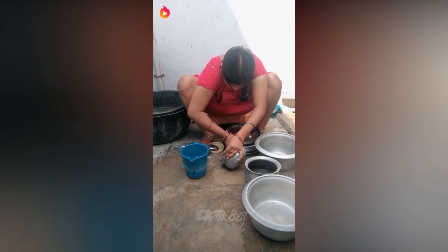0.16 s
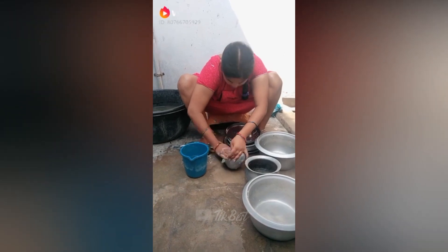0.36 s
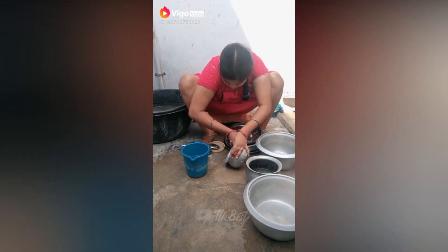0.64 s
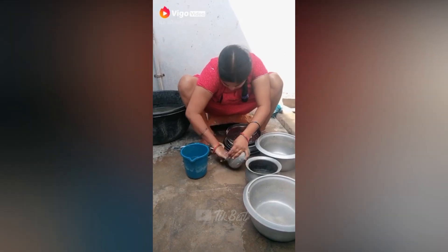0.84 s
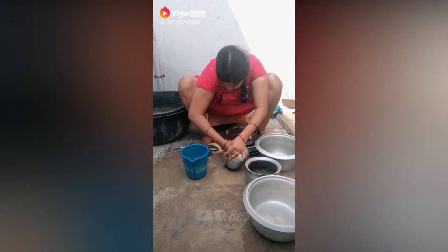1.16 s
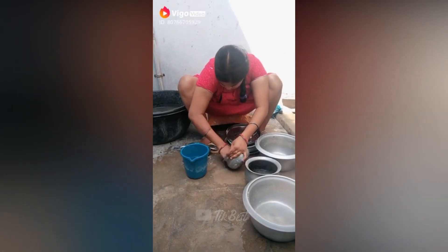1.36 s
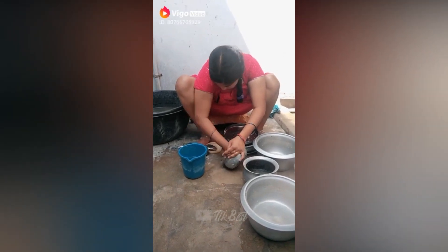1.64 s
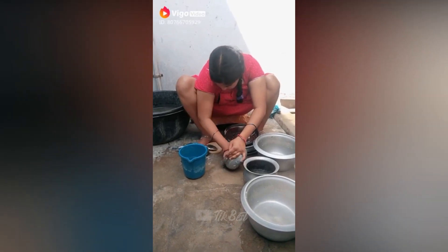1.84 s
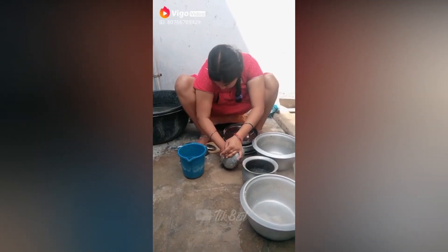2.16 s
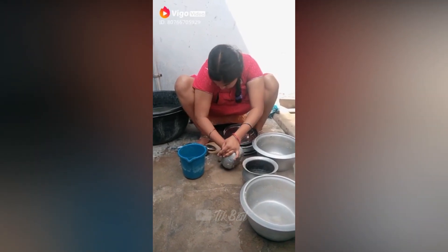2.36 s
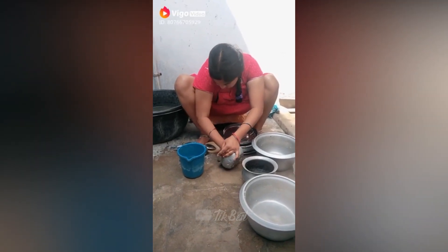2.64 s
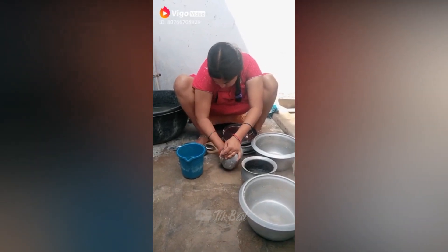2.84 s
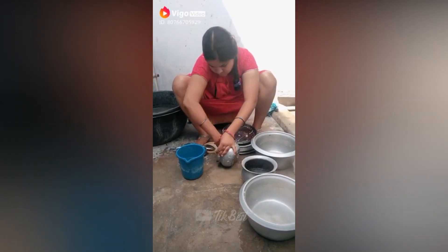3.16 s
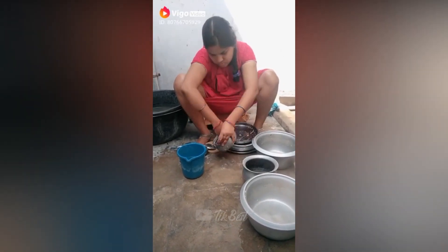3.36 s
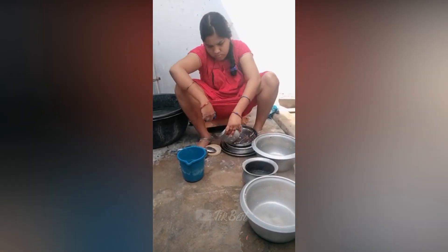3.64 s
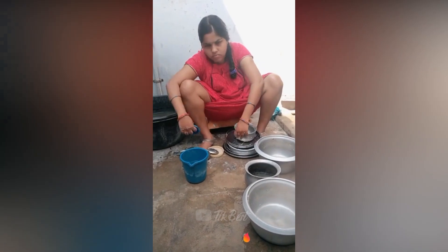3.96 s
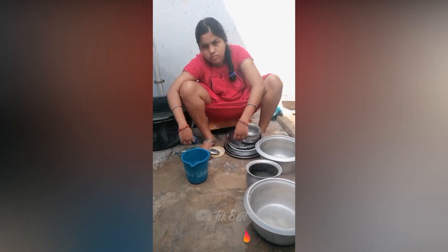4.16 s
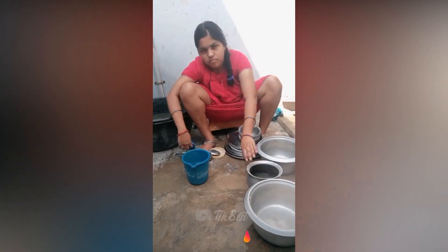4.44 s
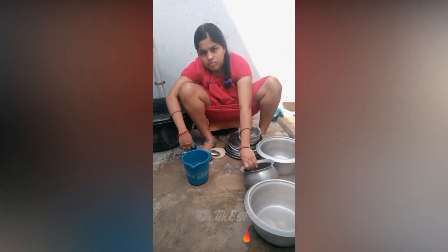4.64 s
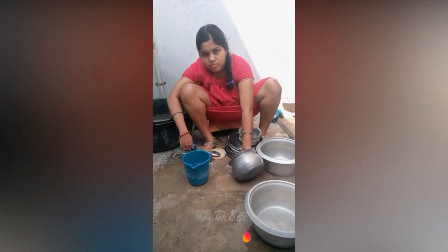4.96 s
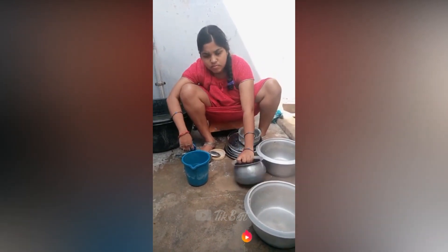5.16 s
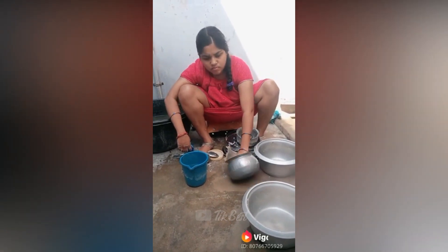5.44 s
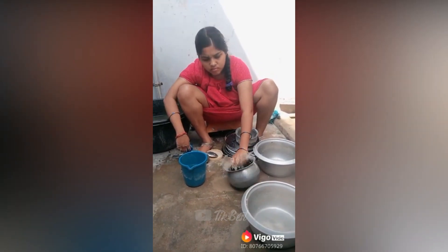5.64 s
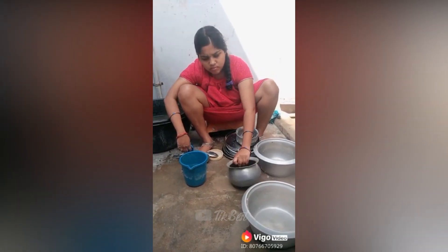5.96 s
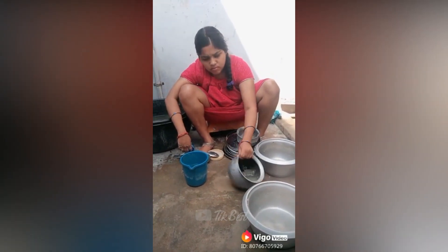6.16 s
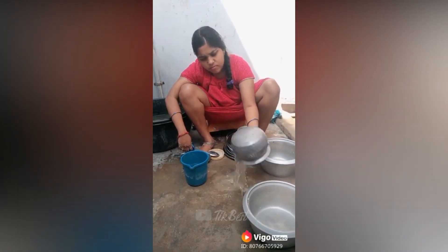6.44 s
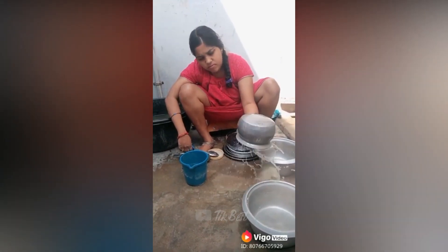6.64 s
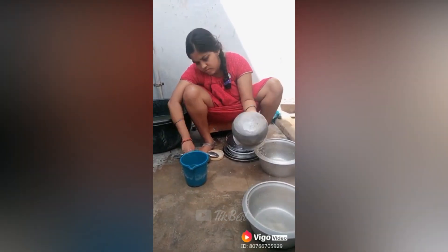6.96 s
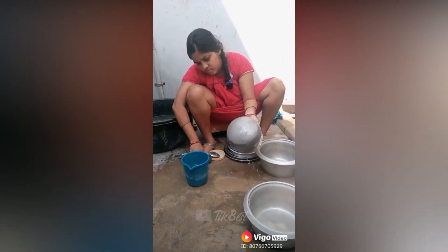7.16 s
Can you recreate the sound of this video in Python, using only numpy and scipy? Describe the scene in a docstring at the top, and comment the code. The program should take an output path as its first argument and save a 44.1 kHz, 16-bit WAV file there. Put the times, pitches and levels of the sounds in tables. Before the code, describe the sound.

Dishwashing by hand on a concrete floor: quick, quiet gritty scrubbing, punctuated by hollow pot bumps and a sharp tick. The pot lands among rattling plates; a larger water pot is struck, rolls with a hollow rumble and rings when righted. Water sloshes inside, then spills with bubbling plops and spray. Short yard echoes, left-heavy pickup, soft outdoor rumble.

```python
"""A wet pad scours a small metal pot in short rasping strokes over a low outdoor rumble: strands catch on metal.
Pot knocks floor and plates, plates rattle: damped modal thuds, clacks, clinks, dense catches for slides.
A round water pot is struck, rolled and righted: ringing wall modes, rumble in a resonant cavity.
Water swirls and pours out: bubble clouds, spray, chirping drops, large plops.
Concrete floor of a walled yard; sources left of the microphone, right port late and muffled."""
import sys
import numpy as np
from scipy import signal
from scipy.fft import rfft, irfft, next_fast_len
from scipy.io import wavfile
from scipy.ndimage import uniform_filter1d, map_coordinates

SR = 44100
rng = np.random.default_rng(int(sys.argv[2]) if len(sys.argv) > 2 else 0)


def log_audio(samples):
    """Write samples as a 16-bit WAV file to the path given in sys.argv[1]."""
    # one column per channel
    frames = np.atleast_2d(samples).T
    # limit to full scale, then quantise
    limited = np.clip(frames, -1, 1)
    pcm = np.round(limited * 32767).astype(np.int16)
    wavfile.write(sys.argv[1], SR, pcm)


N = 322371
TIME = np.arange(N) / SR
HZ = np.maximum(np.fft.rfftfreq(next_fast_len(N), 1 / SR), 1)

# Levels are source levels, ahead of mix trims, echo and port gains.
# Base t60s are scaled per layer; peak levels are ahead of each lift_db.

# outdoor air colour: f/Hz, gain/dB
AIR_COLOUR = [(15, -43), (25, -53), (46, -13), (102, -3), (135, -11.5), (212, -13), (241, -19),
              (270, -15.5), (399, -24.5), (440, -28), (469, -26.5), (670, -29.5), (897, -38.5), (972, -35),
              (1200, -82.5), (1560, -84.5), (2640, -120)]
# right port relative to left: f/Hz, gain/dB
SHADE = [(60, 2.5), (120, -4), (250, -5.5), (500, -14.5), (1000, -25.5), (2000, -34), (4000, -56),
         (12000, -59.5)]
# heavy vessels bumping the floor: t/s, f/Hz, level/dB, t60/s
THUMPS = [(0.634, 300.6, -36.5, 0.32), (2.699, 244, -45, 0.06), (2.875, 225, -23.5, 0.015),
          (3.923, 182, -29, 0.087), (4.615, 196, -23.5, 0.092), (4.625, 100, -40, 0.54),
          (4.939, 128, -42.5, 0.41), (5.055, 97, -31.5, 0.14), (5.06, 302, -31, 0.1),
          (5.195, 340, -34.5, 0.14), (6.127, 82.5, -28.5, 0.086)]
# scouring strokes: start/s, length/s, rasp/dB, hiss/dB
STROKES = [(-0.06, 0.056, -64, -60.5), (0.085, 0.078, -61, -56), (0.265, 0.082, -62, -64.5),
           (0.65, 0.13, -70.5, -66), (0.79, 0.11, -57, -54.5), (1.0, 0.15, -63.5, -57.5),
           (1.26, 0.14, -66.5, -64.5), (1.525, 0.16, -60, -57), (1.66, 0.15, -62.5, -59),
           (1.79, 0.21, -51.5, -55), (2.01, 0.25, -55.5, -57), (2.18, 0.22, -59.5, -62),
           (2.34, 0.21, -53.5, -54.5), (2.56, 0.34, -54, -58), (2.9, 0.089, -54.5, -56),
           (3.02, 0.11, -65, -70.5), (3.17, 0.039, -53, -64), (3.26, 0.012, -42, -48.5),
           (3.51, 0.061, -59, -69.5)]
# pad colour: f/Hz, gain/dB
PAD_COLOUR = [(600, 13.5), (1150, -13.5), (1500, 1), (1900, -4), (2300, -4), (3200, -4), (5000, -3.5),
              (8000, -4.5), (11500, -12.5), (14000, -41.5)]
# small pot and plate resonances: f/Hz, width/Hz, level/dB
PLATE_PEAKS = [(1866, 170, -4.5), (2560, 98, -1), (3125, 178, -4), (5400, 230, -10.5), (7440, 81, -19.5),
               (8850, 340, -11.5)]
# wet metal squealing under pad, on metal or on floor: start/s, length/s, first f/Hz, last f/Hz,
# nominal width/Hz, level/dB
SQUEALS = [(0.31, 0.094, 5560, 4920, 810, -60.5), (2.92, 0.07, 4670, 4400, 200, -57.5),
           (2.955, 0.025, 12100, 11500, 370, -49), (4.085, 0.05, 4780, 4660, 400, -43),
           (4.195, 0.024, 4900, 4780, 300, -42.5), (4.92, 0.078, 2495, 1947, 250, -48.5),
           (5.0, 0.069, 5600, 5000, 700, -50.5)]
# small pot against floor and plates: t/s, thud f/Hz, thud/dB, clack/dB, tick/dB, base t60/s
KNOCKS = [(0.521, 493, -47.5, -70, -39.5, 0.063), (0.572, 576, -53.5, -42.5, -37, 0.05),
          (0.609, 580, -46.5, -65.5, -29.5, 0.0099), (0.629, 608, -26.5, -52.5, -34.5, 0.045),
          (0.637, 631, -27, -44.5, -59.5, 0.056), (0.744, 630, -65, -54, -49, 0.11),
          (0.758, 638, -49.5, -42, -18, 0.018), (1.935, 852, -38.5, -34, -36.5, 0.12),
          (2.159, 582, -44, -48.5, -47.5, 0.078), (2.185, 640, -65, -39, -34, 0.054),
          (2.348, 412, -63, -58, -41, 0.1), (2.473, 600, -42.5, -42, -31, 0.031),
          (2.7, 655, -31, -66, -46.5, 0.062), (2.802, 822, -36, -28.5, -36, 0.055),
          (2.807, 810, -31, -45, -25.5, 0.032), (2.822, 743, -42, -38, -32, 0.19),
          (2.858, 540, -51.5, -41, -44, 0.046), (3.287, 434, -53, -68, -35, 0.026),
          (3.478, 344, -54.5, -44, -45, 0.16), (3.912, 858, -33.5, -30, -35, 0.12),
          (3.928, 490, -24.5, -49.5, -36, 0.078), (3.956, 510, -27, -50, -48.5, 0.021),
          (4.013, 612, -33, -25.5, -26, 0.056), (4.02, 800, -50.5, -28, -35.5, 0.06),
          (4.032, 567, -22.5, -35, -38, 0.054), (4.04, 376, -51, -25, -29, 0.062),
          (4.092, 710, -63, -51, -36, 0.097), (4.119, 710, -57, -52, -30, 0.065),
          (4.169, 664, -48, -32, -30.5, 0.051), (4.212, 695, -47, -39.5, -36.5, 0.073),
          (4.245, 680, -56, -48, -39, 0.033), (4.356, 690, -57, -38.5, -39, 0.036),
          (4.381, 765, -30.5, -35, -29, 0.038), (4.539, 685, -52, -57, -49.5, 0.13)]
# knock colour: f/Hz, gain/dB
KNOCK_COLOUR = [(100, -47), (200, -1.5), (350, -15), (600, -1.5), (1000, -4.5), (1500, 1.5), (2400, 5.5),
                (4500, -3.5), (8000, -7), (12000, -14.5), (14000, -36.5)]
# rim clinks on the sharpest knocks: t/s, brightest f/Hz, level/dB, t60/s
CLINKS = [(0.608, 11700, -33, 0.014), (0.629, 8250, -30.5, 0.035), (0.756, 7500, -19, 0.015),
          (2.189, 11000, -67, 0.011), (2.807, 5300, -30, 0.024), (3.287, 6200, -31, 0.032),
          (3.477, 2580, -36, 0.026)]
# small pot rim modes: f/Hz, level/dB
RIM_MODES = [(2620, 7.5), (5550, -5), (8100, -1), (12000, 2)]
# small pot dragged over floor: start/s, length/s, rumble/dB, rasp/dB, hiss/dB
DRAGS = [(0.44, 0.096, -40.5, -51, -43), (0.66, 0.071, -48, -88.5, -63.5)]
# drag colour: f/Hz, gain/dB
DRAG_COLOUR = [(100, -16), (300, -5), (700, -2), (1100, -4.5), (1700, 14.5), (2600, 9), (4300, -14),
               (7500, -11.5), (10000, -4.5), (13000, -12.5)]
# plates rock, slide and settle: start/s, length/s, rumble/dB, rasp/dB, hiss/dB
PLATE_SLIDES = [(3.905, 0.035, -32.5, -43, -44), (4.01, 0.035, -38, -41, -41),
                (4.07, 0.072, -54, -42.5, -40), (4.15, 0.07, -46.5, -45, -49),
                (4.38, 0.016, -47.5, -56, -64)]
# sliding plate resonances: f/Hz, width/Hz, level/dB
SLIDE_PEAKS = [(2380, 540, 1), (4800, 150, -5.5), (5300, 72, -23), (6150, 310, 4), (9170, 120, 6)]
# blows on water pot: t/s, thud f/Hz, thud/dB, clack/dB, tick/dB, base t60/s, ring/dB
CLANGS = [(4.606, 1010, -22, -29.5, -29, 0.066, -35.5), (4.661, 601, -33, -39, -37.5, 0.16, -41.5),
          (4.696, 720, -45, -39, -52, 0.025, -70), (4.81, 976, -42, -50, -58, 0.031, -44.5),
          (4.858, 540, -38, -39, -50, 0.032, -55.5), (4.907, 700, -52, -37, -45, 0.025, -51),
          (5.194, 1031, -27.5, -33, -20.5, 0.11, -25.5), (5.378, 517, -76, -53, -45.5, 0.11, -52.5)]
# water pot tips, rolls on rim, then belly, rocks to rest:
# start/s, length/s, rumble/dB, rasp/dB, hiss/dB, ring/dB
ROLLS = [(4.54, 0.18, -44.5, -60, -65, -51.5), (4.62, 0.22, -45, -46, -47.5, -42),
         (4.82, 0.24, -39.5, -45.5, -46, -52.5), (5.08, 0.36, -49.5, -61.5, -67.5, -70)]
# water pot wall modes: f/Hz, free level/dB, t60/s, level against floor/dB
POT_MODES = [(712, -30, .3, -9), (910.5, -18.5, 1.6, -12), (1061, -14, .75, -2), (1297, -20.5, .65, -12),
             (1465, -11, .22, -12), (1492, -5, .32, -7), (1516, -11, .33, -11), (1610, -11, .14, -20),
             (1691, -12, .8, -4), (2099, -3, .22, -6), (2920, -18, .5, -8), (3190, -11, .14, -10),
             (3465, -20, .15, -12), (3878, -8, .28, -4), (5780, -17, .3, -8)]
# crowded upper water pot resonances: f/Hz, width/Hz, level/dB
POT_PEAKS = [(4270, 18, 2), (5400, 34, -6), (5760, 29, -5), (6900, 90, -7.5), (7200, 49, -19),
             (7290, 39, 3), (7680, 71, -5.5), (8820, 23, 11)]
# air inside water pot: f/Hz, width/Hz, level/dB
CAVITY = [(202, 25, -9), (299, 30, 5), (385, 25, 0), (505, 30, -2), (571, 55, 5)]
# water pot colour: f/Hz, gain/dB
POT_COLOUR = [(30, -51), (76, -17), (130, -5.5), (302, 0), (446, -11.5), (554, -1), (787, -12.5),
              (1060, -12.5), (1360, -11), (1470, -18.5), (2200, -3.5), (2560, -13.5), (3000, -10),
              (3770, -11), (7930, -8), (12400, -20.5), (14000, -49)]
# pot booms in rolling, gulps as water swings, sings in pouring:
# start/s, length/s, first f/Hz, last f/Hz, nominal width/Hz, level/dB
BOOMS = [(4.83, 0.04, 534, 555, 40, -36), (4.905, 0.074, 533, 596, 129, -34),
         (4.98, 0.11, 568, 584, 173, -43.5), (4.97, 0.1, 316.5, 300.4, 69.6, -42),
         (5.94, 0.06, 600, 608, 70, -50.5), (5.99, 0.057, 269, 403.7, 110, -32.5),
         (6.032, 0.033, 552, 589, 59.1, -26.5), (6.075, 0.11, 574.6, 592, 178, -45.5),
         (6.385, 0.031, 1450, 1470, 90, -41.5), (6.69, 0.044, 1074, 1084, 59.6, -47.5),
         (6.705, 0.031, 1520, 1550, 50, -42.5), (6.75, 0.04, 1570, 1527, 120, -49)]
# water surges, from swishes through slosh and gulp to pour and drain-off:
# start/s, length/s, slosh/dB, bubbles/dB, spray/dB
SURGES = [(5.59, 0.14, -42.5, -48.5, -46), (5.81, 0.09, -56, -42.5, -42.5), (5.95, 0.21, -36, -46, -62),
          (6.0, 0.1, -30, -43.5, -45.5), (6.24, 0.21, -67, -59, -50), (6.41, 0.277, -59, -45.5, -42.5),
          (6.735, 0.12, -50, -41, -38.5), (7.025, 0.036, -60, -61, -44), (6.97, 0.18, -58, -52.5, -46)]
# water landing: t/s, bubbles/dB, spray/dB, base t60/s
SPLASHES = [(5.604, -38, -38, 0.2), (5.668, -35, -30, 0.064), (5.7, -48, -37, 0.11),
            (5.884, -42, -32.5, 0.086), (5.891, -37, -43, 0.022), (5.906, -46, -30.5, 0.037),
            (5.947, -44, -32, 0.04), (5.968, -40.5, -28, 0.031), (6.006, -35, -48, 0.035),
            (6.017, -46, -28, 0.024), (6.105, -38, -39, 0.091), (6.119, -33.5, -41, 0.094),
            (6.164, -39, -38, 0.084), (6.259, -45, -42, 0.062), (6.413, -30, -30, 0.055),
            (6.553, -34.5, -29, 0.045), (6.673, -70, -36.5, 0.4), (6.745, -28.5, -16, 0.049),
            (6.769, -34, -27, 0.056), (6.786, -51, -34, 0.05), (6.805, -19, -21, 0.03),
            (6.812, -27, -24, 0.014), (6.871, -55, -29.5, 0.057), (6.896, -33.5, -30.5, 0.043),
            (6.955, -51, -35.5, 0.055), (7.031, -42.5, -31, 0.078), (7.043, -40, -35.5, 0.055),
            (7.108, -60, -30.5, 0.023), (7.118, -60, -40, 0.011), (7.158, -58, -48, 0.047),
            (7.247, -72, -35, 0.035), (7.291, -71, -36.5, 0.045)]
# single large bubbles: t/s, f/Hz, level/dB, t60/s, phase rise (pitch climbs by twice this share over t60)
PLOPS = [(5.624, 2087, -28.5, 0.064, 0.017), (5.666, 1563, -31.5, 0.046, 0.11),
         (5.83, 2070, -38, 0.05, 0.14), (5.847, 1634, -45, 0.071, 0.064), (5.889, 3340, -28, 0.083, 0.13),
         (6.007, 940, -26.5, 0.024, 0.092), (6.046, 2180, -28, 0.035, 0.12), (6.059, 1020, -35, 0.059, .15),
         (6.074, 1466, -29, 0.049, 0.13), (6.105, 2140, -43, 0.13, 0.106), (6.416, 1757, -30, 0.083, 0.065),
         (6.468, 1930, -41, 0.045, .15), (6.489, 2276, -31.5, 0.064, 0.24),
         (6.526, 1560, -33.5, 0.041, 0.12), (6.552, 1040, -30.5, 0.041, 0.018),
         (6.639, 1830, -35, 0.05, 0.1), (6.753, 3670, -22.5, 0.055, 0.04), (6.783, 3660, -22, 0.025, 0.13),
         (6.805, 1665, -18.5, 0.028, 0.13), (6.807, 1140, -28, 0.02, 0.08), (6.81, 485, -37, 0.1, 0.018),
         (6.896, 2110, -32, 0.062, 0.15), (6.96, 2860, -38, 0.04, 0.13), (7.041, 2840, -26.5, 0.037, 0.15)]
# water colour: f/Hz, gain/dB
WATER_COLOUR = [(35, -28), (100, 4), (200, -4), (310, -8), (450, -10.5), (580, -6.5), (800, -7.5),
                (1200, -21), (1800, -13), (3500, -10), (5000, 0.5), (7500, 6), (10000, 2.5), (13000, -7)]

AIR_DB, HUM_HZ, HUM_DB = -54.5, 106.4, -60.5
YARD_T60_S, YARD_DB, SHADED_YARD_DB = 0.21, -7, -1
PORT_DELAY_S, CUTOFF_HZ = 0.00056, 13400
STROKE_ATTACK_S, STROKE_RELEASE_S = 0.061, 0.26
SNAGS_PER_S, SNAG_T60_S, SNAG_SHARE = 210, 0.018, 0.4  # pad strands snag in bunches
SHEEN_DB, SHEEN_HZ = -3, 10300  # light strokes, with little rasp, gain sheen above this pitch
SQUEAL_ATTACK_S, SQUEAL_RELEASE_S = 0.013, 0.06
THUD_RISE_S = 0.0022  # time constant
CLINK_SPREAD, CLINK_DB_PER_OCTAVE = 0.024, 13  # pitch share; loss away from brightest pitch
DRAG_ATTACK_S, DRAG_RELEASE_S = 0.087, 0.48
SLIDE_ATTACK_S, SLIDE_RELEASE_S = 0.0085, 0.58
RATTLES_PER_S, RATTLE_T60_S, RATTLE_SHARE = 260, 0.02, 0.35  # plate rims bounce on each other
PLATE_DULL_HZ = 10800  # wet plates slide with less treble than knocks
ROLL_ATTACK_S, ROLL_RELEASE_S = 0.033, 0.14
BUMPS_PER_S, BUMP_T60_S, BUMP_SHARE = 110, 0.025, 0.45  # rolling over grains of grit
ROLLING_UNTIL_S, ROLLING_MAX_T60_S, ROLL_MODE_WIDTH_HZ = 5.1, 0.4, 30
SWING_DB, SWING_HZ = 2.5, 6  # struck pot wobbles in the hand: modes swell and fade
BOOM_ATTACK_S, BOOM_RELEASE_S = 0.024, 0.08
WATER_START_S = 5.58
SURGE_ATTACK_S, SURGE_RELEASE_S = 0.012, 0.4
SPATTERS_PER_S, SPATTER_T60_S, SPATTER_SHARE = 90, 0.05, 0.65  # water lands in separate gobs
SLAP_DB = -31  # low slap of a splash, relative to its bubbles
DROPS_PER_S, DROP_DB, DROP_SPREAD_DB = 170, 7, 20  # levels relative to flow
DROP_LOW_HZ, DROP_HIGH_HZ, DROP_CYCLES, DROP_RISE = 2400, 10000, 100, 0.09  # t60 in cycles; phase rise
PLOP_RISE_S = 0.0027  # time constant
PLOP_CHURN, PLOP_CHURN_HZ = 0.6, 450  # flutter depth and rate


def from_db(db):
    """Decibels to gain."""
    return 10 ** (np.asarray(db) / 20)


def rms_one(x):
    """Scale to unit power."""
    return x / np.sqrt(np.mean(x ** 2) + 1e-20)


def gain_curve(points):
    """Gain over frequency from (f/Hz, gain/dB) points, interpolated on log frequency."""
    hz, db = np.transpose(points)
    return from_db(np.interp(np.log(HZ), np.log(hz), db))


def filtered(x, gain):
    """Apply a gain over frequency."""
    return irfft(rfft(x, next_fast_len(N)) * gain, next_fast_len(N))[..., :N]


def add(out, s, sound):
    """Mix a sound in at a time."""
    start = int(np.clip(s * SR, 0, N - 1))
    out[start:start + len(sound)] += sound[:N - start]


def dying(t60):
    """Time axis and exponential fall of one decay."""
    t60 = max(t60, .001)
    t = TIME[:int(t60 * SR)]
    return t, from_db(-60 * t / t60)


def rising(t, rise_s):
    """Exponential build-up with a time constant."""
    return 1 - np.exp(-t / rise_s)


def registers(x, gain):
    """Colour a sound and split it into low, middle and high registers of unit power."""
    above_low = 1 / (1 + (950 / HZ) ** 8)
    above_mid = 1 / (1 + (4000 / HZ) ** 8)
    splits = np.array([1 - above_low, above_low - above_mid, above_mid])
    return np.array([rms_one(band) for band in filtered(x, gain * splits)])


def ragged(depth_db, spacing_hz):
    """Crowded upper modes of thin metal make a jagged response."""
    pattern = rng.standard_normal(2000)
    return from_db(depth_db * np.interp(HZ / max(spacing_hz, 20), np.arange(2000), pattern))


def resonances(peaks, lift_db):
    """Resonances standing out of a flat response."""
    shape = sum(from_db(db) / (1 + (2 * (HZ - hz) / width_hz) ** 2) for hz, width_hz, db in peaks)
    return 1 + from_db(lift_db) * shape


def grit(per_s, spread_db):
    """Tiny catches of uneven size at random moments."""
    sizes = from_db(spread_db * np.minimum(rng.exponential(1, N), 4.5))
    return sizes * rng.choice([-1, 1], N) * (rng.random(N) < per_s / SR)


def roaming(x, depth_db, spacing_hz, per_s):
    """A moving contact point feeds other groups of modes: peaks and dips shift about."""
    hz, s, frames = signal.stft(x, SR, nperseg=1024)
    pattern = rng.standard_normal((400, 400))
    group = np.sqrt(hz / max(spacing_hz, 2))  # groups widen towards the treble
    where = np.meshgrid(group, s * abs(per_s), indexing="ij")
    weight = map_coordinates(pattern, where, order=1, mode="mirror")
    gain = from_db(depth_db * weight.clip(-1.6, 1.6))
    gain /= np.sqrt(uniform_filter1d(gain ** 2, size=61, axis=0))  # even out power among nearby modes
    return signal.istft(frames * gain, SR)[1][:N]


def jolts(per_s, t60, share):
    """Gain of unit power in which unevenly spaced jolts carry a share of the energy."""
    count = int(per_s * TIME[-1])
    when = (np.arange(count) + rng.uniform(0, 2.1, count)) / per_s
    powers = from_db(rng.uniform(-14, 0, count)) ** 2
    kicks = np.bincount((when * SR).astype(int), powers, minlength=N)[:N]
    power = signal.lfilter([1], [1, -from_db(-120 / (t60 * SR))], kicks + 1e-18)
    return np.sqrt(1 - share + share * power / power.mean())


def moves(rows, attack_s, release_s):
    """Movements swell, hold and die away; one gain over time for each dB column."""
    power = 0
    for start, length, *db in rows:
        swell = np.clip((TIME - start) / attack_s, 0, 1) ** 2
        fall = from_db(-60 * np.clip((TIME - start - length) / release_s, 0, 3))
        power = power + np.outer(from_db(db), swell * fall) ** 2
    return np.sqrt(power)


def bursts(times, levels_db, t60s):
    """Envelope of sudden blows that die away."""
    out = np.zeros(N)
    for s, db, t60 in zip(times, levels_db, t60s):
        t, fall = dying(t60)
        add(out, s, from_db(db) * fall * rising(t, 0.00075))
    return out


def blows(rows, body, thud_spread, thud_length, clack_length):
    """Hollow thuds of clustered low modes; clacks and ticks from dense upper modes."""
    s, _, _, clack_db, tick_db, t60 = np.transpose(rows)[:6]
    noise = roaming(rng.standard_normal(N), depth_db=8, spacing_hz=3.064, per_s=9)
    _, clack, tick = registers(noise, body)
    out = clack * bursts(s, clack_db, t60 * clack_length) + tick * bursts(s, tick_db, t60)
    for start, hz, thud_db, _, _, length, *_ in rows:
        t, fall = dying(length * thud_length)
        pitches = hz * np.exp(thud_spread * rng.laplace(size=(24, 1)).clip(-4, 2))
        cluster = np.sin(2 * np.pi * (pitches * t + rng.random(pitches.shape))).sum(axis=0) * fall
        thud = rms_one(cluster) * np.std(fall) * rising(t, THUD_RISE_S)
        add(out, start, from_db(thud_db) * thud)
    return out


def scrape(gains, body, catches_per_s, shift_db, shifts_per_s):
    """Metal slips over a rough surface: dense catches into a body whose response keeps shifting."""
    catches = roaming(grit(catches_per_s, spread_db=1.5), shift_db, spacing_hz=2.52, per_s=shifts_per_s)
    return (gains * registers(catches, body)).sum(axis=0)


def glides(rows, attack_s, release_s):
    """Noise drives a resonance whose pitch slides while it sounds."""
    out = np.zeros(N)
    for start, length, first_hz, last_hz, width_hz, db in rows:
        t = TIME[:int((length + release_s) * SR)]
        r = np.exp(-np.pi * 1.5 * abs(width_hz) / SR)
        drive = rng.standard_normal(SR) + 1j * rng.standard_normal(SR)
        waver = signal.lfilter([1], [1, -2 * r, r * r], drive)[-len(t):]
        waver = waver / np.sqrt(abs(waver))  # halve the level swings in dB
        pitch_hz = np.interp(t, [0, length], [first_hz, last_hz])
        carrier = np.exp(2j * np.pi * np.cumsum(pitch_hz) / SR)
        tone = rms_one(np.real(waver * carrier))
        fall = from_db(-60 * np.maximum(t - length, 0) / release_s)
        add(out, start, from_db(db) * tone * np.minimum(t / attack_s, 1) * fall)
    return out


def bubble(hz, t60, rise):
    """A bubble rings and rises in pitch as it nears the surface."""
    t, fall = dying(t60)
    return fall * np.sin(2 * np.pi * hz * t * (1 + rise * t / t60))


def air():
    """Low, distant outdoor rumble, about half shared between ports, half each port's own; wavering hum."""
    noise = rng.standard_normal(N) + from_db(0.5) * rng.standard_normal((2, N))
    rumble = rms_one(filtered(noise, gain_curve(AIR_COLOUR)))
    hum = rms_one(filtered(rng.standard_normal(N), 1 / (1 + ((HZ - HUM_HZ) / 5) ** 2)))
    return from_db(AIR_DB) * rumble + from_db(HUM_DB) * hum


def yard(x):
    """Scattered, decaying wall and floor echoes, relatively stronger at the shaded port."""
    t, fall = dying(YARD_T60_S)
    echoes = rng.standard_normal((2, len(t))) * fall * rising(t, 0.0029)
    echoes /= np.sqrt(np.sum(echoes ** 2, axis=1, keepdims=True))
    reflected = signal.fftconvolve(x[None], echoes, axes=1)[:, :N]
    return x + from_db([[YARD_DB], [SHADED_YARD_DB]]) * reflected


def thumps():
    """Dull bumps of heavy vessels on the floor: decaying sines."""
    out = np.zeros(N)
    for s, hz, db, t60 in THUMPS:
        t, fall = dying(t60)
        add(out, s, from_db(db) * fall * np.sin(2 * np.pi * hz * t) * rising(t, 0.0031))
    return out


def drops(flow):
    """Stray drops ring at random moments and chirp upwards; level follows the flow."""
    out = np.zeros(N)
    span_s = TIME[-1] - WATER_START_S
    for when, pitch, size in rng.random((int(DROPS_PER_S * span_s), 3)):
        s = WATER_START_S + when * span_s
        hz = DROP_LOW_HZ * (DROP_HIGH_HZ / DROP_LOW_HZ) ** pitch
        level = flow[int(s * SR)] * from_db(DROP_DB - DROP_SPREAD_DB * size)
        add(out, s, level * bubble(hz, DROP_CYCLES / hz, DROP_RISE))
    return out


def plops():
    """Large bubbles ring unsteadily in the churning water."""
    out = np.zeros(N)
    for start, hz, db, length, rise in PLOPS:
        plop = bubble(hz, length, rise)
        t = TIME[:len(plop)]
        flutter = np.interp(t * PLOP_CHURN_HZ, np.arange(200), rng.standard_normal(200))
        churn = 1 + PLOP_CHURN * flutter
        add(out, start, from_db(db) * plop * churn * rising(t, PLOP_RISE_S))
    return out


def water():
    """Small bubbles and spray swell with each surge and burst at each splash, with drops and plops."""
    cloud, first = np.zeros(N), int(WATER_START_S * SR)
    for when, pitch, size in rng.random((8000, 3)):
        hz = 1100 * 11 ** (pitch ** .7)
        s = WATER_START_S + when * (TIME[-1] - WATER_START_S)
        add(cloud, s, from_db(-24 * size) * bubble(hz, 70 / hz, rise=0.018))
    cloud /= np.std(cloud[first:])
    spray = roaming(grit(per_s=2500, spread_db=1.5), depth_db=13.0, spacing_hz=5.98, per_s=35)
    fizz = cloud + from_db(-0.5) * rms_one(spray)
    pot = resonances(CAVITY + POT_PEAKS, lift_db=5.5)  # pot colours the water in it
    bands = registers(fizz, gain_curve(WATER_COLOUR) * pot)
    bands /= np.std(bands[:, first:], axis=1, keepdims=True)
    s, bubbles_db, spray_db, t60 = np.transpose(SPLASHES)
    splashes = np.array([bursts(s, bubbles_db + SLAP_DB, t60 * 1.8),
                         bursts(s, bubbles_db, t60 * 1.15),
                         bursts(s, spray_db, t60)])
    flow = moves(SURGES, SURGE_ATTACK_S, SURGE_RELEASE_S)
    spatter = np.array([jolts(SPATTERS_PER_S, SPATTER_T60_S, SPATTER_SHARE) for _ in bands])
    gains = np.hypot(from_db(-7.0) * flow * spatter, splashes)
    return (gains * bands).sum(axis=0) + drops(flow[1:].mean(axis=0)) + plops()


def pot_ring():
    """Wall modes sing in rolling over grit and ring after blows, cut short while lying against the floor."""
    wall = sum(from_db(db) / (1 + (2 * (HZ - hz) / ROLL_MODE_WIDTH_HZ) ** 2) for hz, _, _, db in POT_MODES)
    singing = rms_one(filtered(grit(per_s=1700, spread_db=0.5), wall))
    out = moves(ROLLS, ROLL_ATTACK_S, ROLL_RELEASE_S)[-1] * singing
    for s, *_, ring_db in CLANGS:
        lying = s < ROLLING_UNTIL_S
        for hz, free_db, t60, lying_db in POT_MODES:
            db = lying_db if lying else free_db
            t, fall = dying(min(t60, ROLLING_MAX_T60_S) if lying else t60)
            swing_db = SWING_DB * np.sin(2 * np.pi * (SWING_HZ * t + rng.random()))
            tone = np.sin(2 * np.pi * (hz * t + rng.random()))
            add(out, s, from_db(ring_db + db + swing_db) * fall * tone)
    return out


def water_pot():
    """Blows thud and clack on the big pot; rolling over grit rumbles in its cavity."""
    body = gain_curve(POT_COLOUR) * resonances(POT_PEAKS, lift_db=-2.5)
    knocks = blows(CLANGS, body, thud_spread=0.51, thud_length=1.5, clack_length=1.8)
    cavity = resonances(CAVITY, lift_db=-16.5)
    rolling = moves(ROLLS, ROLL_ATTACK_S, ROLL_RELEASE_S)[:3] * jolts(BUMPS_PER_S, BUMP_T60_S, BUMP_SHARE)
    rumble = scrape(rolling, body * cavity, catches_per_s=1600, shift_db=10.0, shifts_per_s=17)
    return knocks + from_db(-0.5) * rumble


def clinks():
    """The small pot's rim rings briefly in groups of close, beating modes."""
    out = np.zeros(N)
    for s, brightest_hz, db, t60 in CLINKS:
        t, fall = dying(t60)
        for hz, mode_db in RIM_MODES:
            pitches = hz * (1 + CLINK_SPREAD * rng.standard_normal((6, 1)))
            cluster = np.sin(2 * np.pi * (pitches * t + rng.random((6, 1)))).sum(axis=0) * fall
            level_db = db + mode_db - CLINK_DB_PER_OCTAVE * abs(np.log2(hz / brightest_hz))
            add(out, s, from_db(level_db) * rms_one(cluster) * np.std(fall))
    return out


def small_pot_and_plates(metal):
    """Damped knocks, clinks, drags over the floor, and chatter of plates shifting under the pot."""
    colour = gain_curve(KNOCK_COLOUR)
    knocks = blows(KNOCKS, colour * metal, thud_spread=.22, thud_length=1.86, clack_length=1.2)
    drag = scrape(moves(DRAGS, DRAG_ATTACK_S, DRAG_RELEASE_S), gain_curve(DRAG_COLOUR),
                  catches_per_s=4300, shift_db=4.5, shifts_per_s=20.1)
    rattle = jolts(RATTLES_PER_S, RATTLE_T60_S, RATTLE_SHARE)
    slides = from_db(-3.0) * moves(PLATE_SLIDES, SLIDE_ATTACK_S, SLIDE_RELEASE_S) * rattle
    plates = colour * resonances(SLIDE_PEAKS, lift_db=1.0) / (1 + (HZ / PLATE_DULL_HZ) ** 6)
    chatter = scrape(slides, plates, catches_per_s=5000, shift_db=6.0, shifts_per_s=27)
    return from_db(-0.5) * knocks + clinks() + drag + chatter


def scouring(metal):
    """Pad strands catch on the hand-damped pot, which hums hollowly under them."""
    rasp_gain, hiss_gain = moves(STROKES, STROKE_ATTACK_S, STROKE_RELEASE_S)
    strands = roaming(grit(per_s=3400, spread_db=-1.5), depth_db=8.5, spacing_hz=2.904, per_s=28)
    strands = strands * jolts(SNAGS_PER_S, SNAG_T60_S, SNAG_SHARE)
    _, rasp, hiss = registers(strands, gain_curve(PAD_COLOUR) * metal)
    hollow_gain = 1 / (1 + ((HZ - 690) / 120) ** 2) / (1 + (HZ / 1000) ** 6)
    hollow = rms_one(filtered(rng.standard_normal(N), hollow_gain))
    lightness = (hiss_gain / (hiss_gain + rasp_gain + 1e-12)) ** 3
    treble = rms_one(filtered(strands, 1 / (1 + (SHEEN_HZ / HZ) ** 8) * (HZ < CUTOFF_HZ)))
    sheen = from_db(SHEEN_DB) * lightness * treble
    return rasp_gain * (from_db(-6.5) * rasp + from_db(-7.5) * hollow) + hiss_gain * (hiss + sheen)


def scene():
    """Sources echo in the yard; pot ring and outdoor air join without echoes; right port late and muffled."""
    metal = resonances(PLATE_PEAKS, lift_db=3.5) * ragged(depth_db=1.7, spacing_hz=69.57)
    squeals = glides(SQUEALS, SQUEAL_ATTACK_S, SQUEAL_RELEASE_S)
    booms = glides(BOOMS, BOOM_ATTACK_S, BOOM_RELEASE_S)
    vessels = scouring(metal) + small_pot_and_plates(metal) + water_pot() + thumps()
    sound = yard(vessels + water() + squeals + booms) + pot_ring() + air()
    shade = gain_curve(SHADE)
    late = np.exp(-2j * np.pi * HZ * PORT_DELAY_S)
    ports = 2 / (1 + shade) * np.array([np.ones_like(late), shade * late])  # port gains average 1
    return filtered(sound, ports) + from_db(-83.0) * rng.standard_normal((2, N))  # plus faint hiss


def record(dry):
    """The microphone sheds the deepest bass; the top is cut steeply."""
    dry = signal.sosfilt(signal.butter(2, 36, "high", fs=SR, output="sos"), dry)
    return signal.sosfilt(signal.ellip(10, .2, 80, CUTOFF_HZ, fs=SR, output="sos"), dry)


dry = scene()
out = record(dry)
log_audio(out)
```